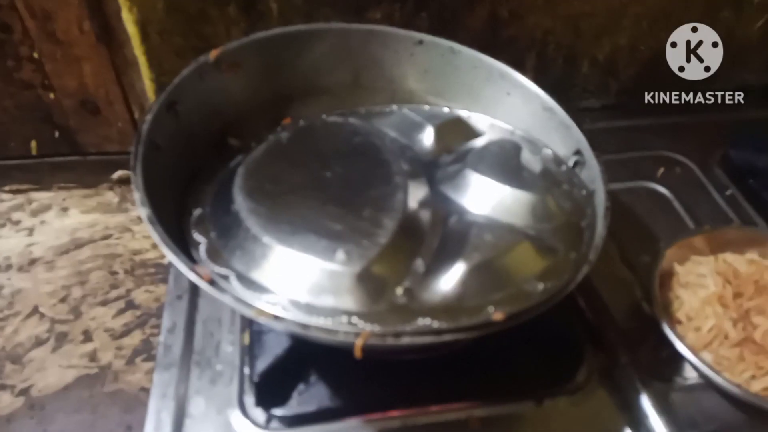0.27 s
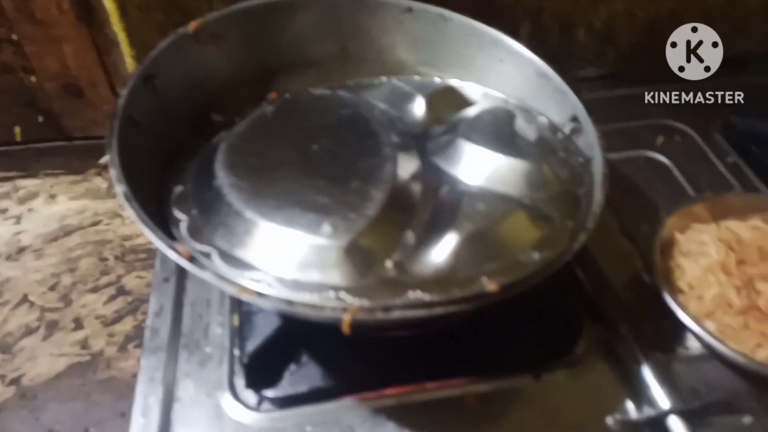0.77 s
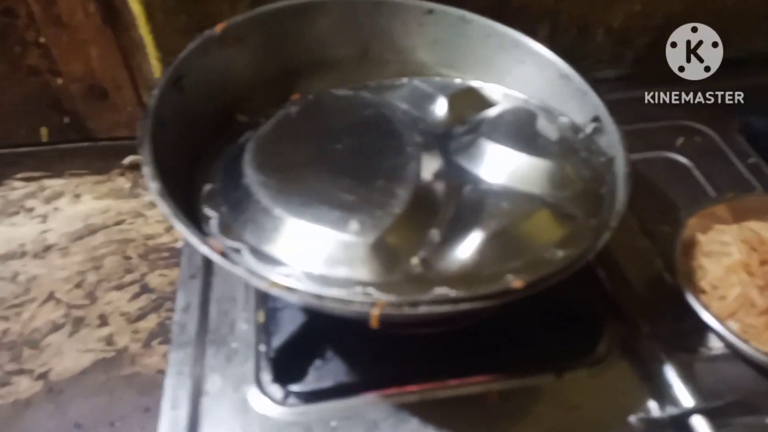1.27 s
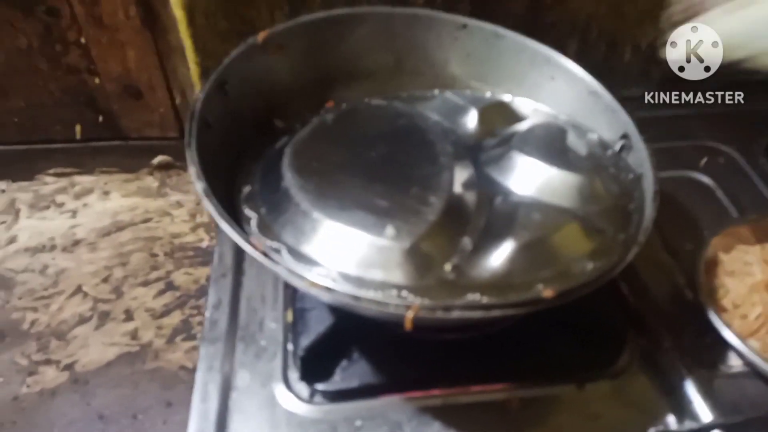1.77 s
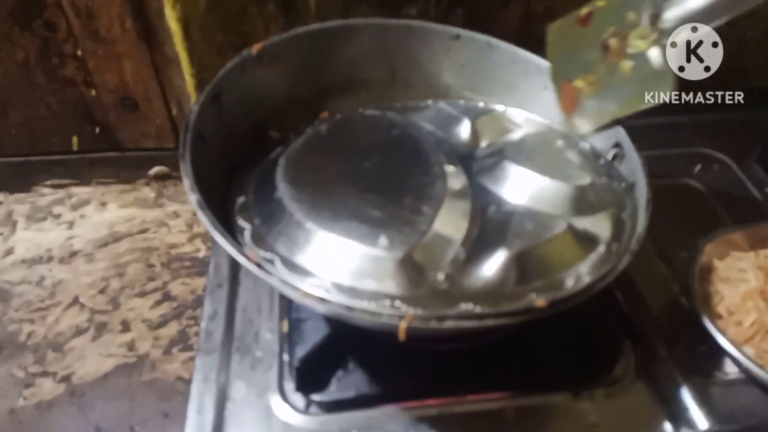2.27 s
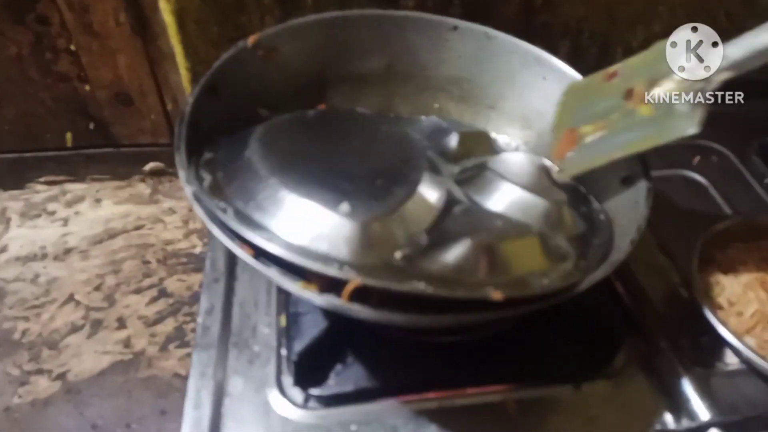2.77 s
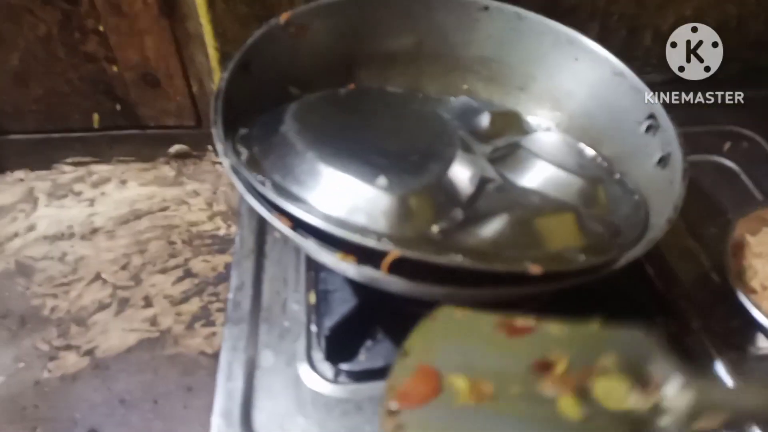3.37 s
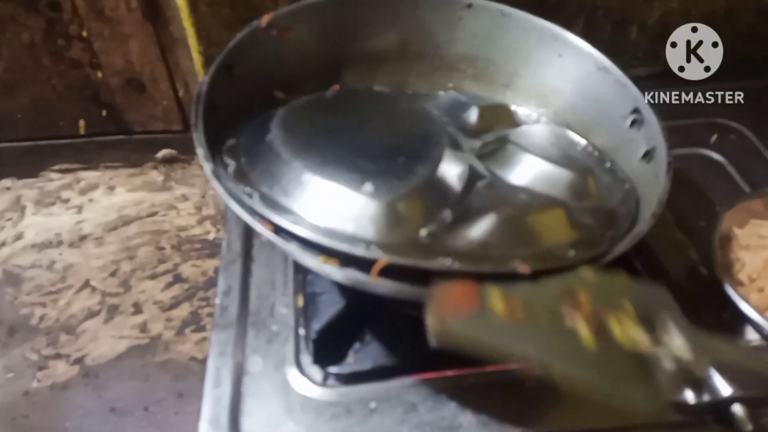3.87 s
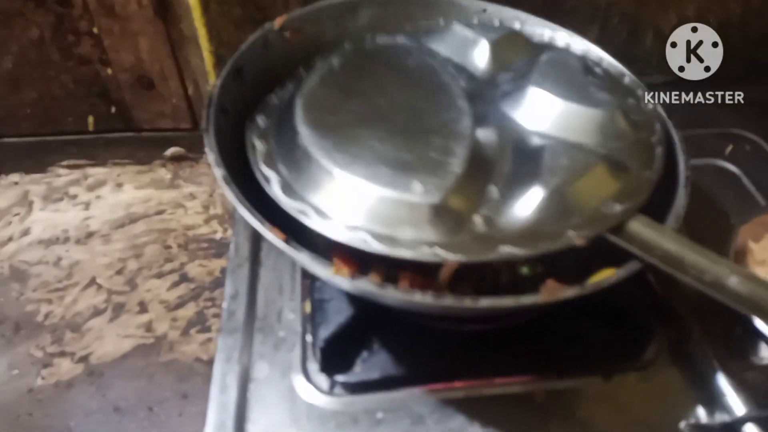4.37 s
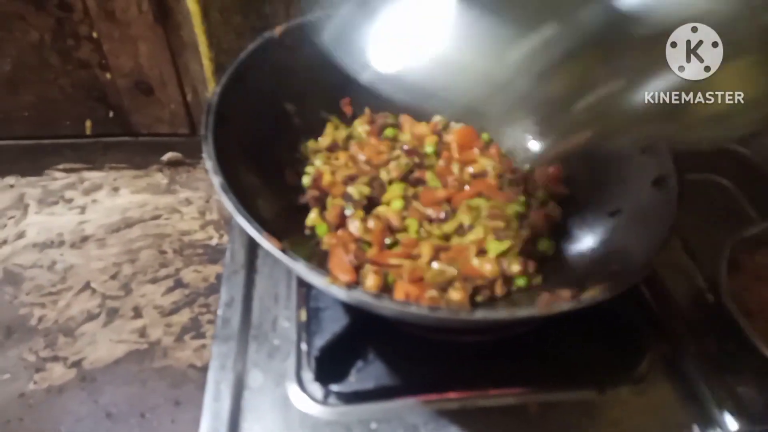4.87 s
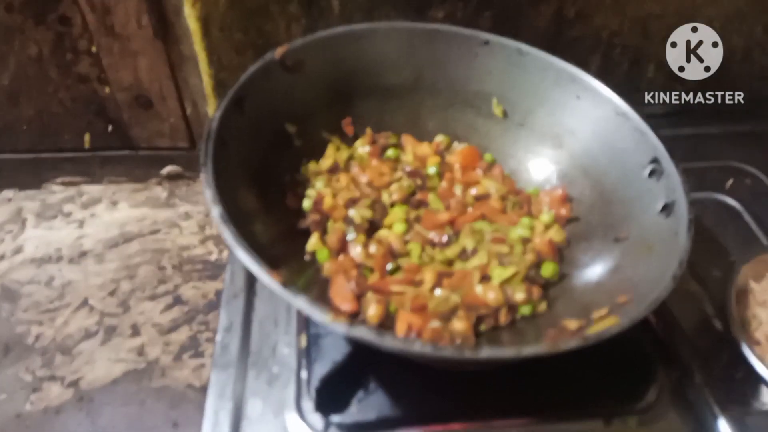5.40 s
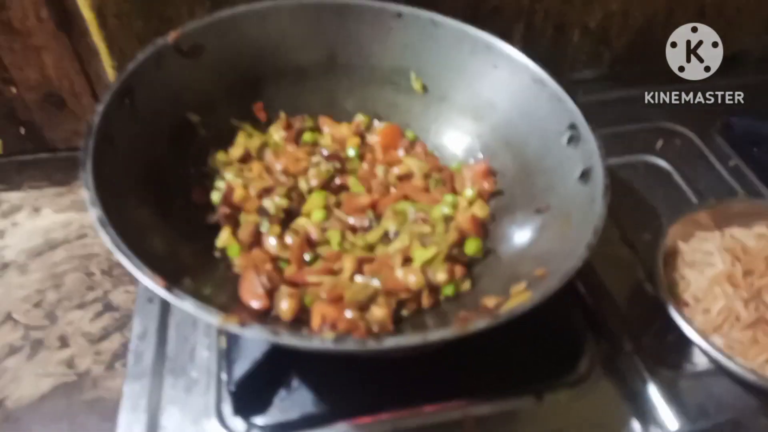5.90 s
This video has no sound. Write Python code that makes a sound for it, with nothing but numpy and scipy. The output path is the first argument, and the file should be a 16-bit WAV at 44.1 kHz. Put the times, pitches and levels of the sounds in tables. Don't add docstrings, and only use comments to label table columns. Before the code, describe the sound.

Close in a small hard kitchen, vegetables hiss softly under a steel lid while faint drags rub the stove's sheet metal. A sharp fat pop scatters droplets. Then a spatula taps and scrapes the lid, clanks it hard, pauses with a low puff of air on the microphone, rattles it off, and finally the lid lands on the stove with loud bright clatter.

```python
import sys
import numpy as np
from scipy import signal
from scipy.fft import rfft, irfft, next_fast_len
from scipy.io import wavfile
from scipy.ndimage import uniform_filter1d

SR = 44100
rng = np.random.default_rng(int(sys.argv[2]) if len(sys.argv) > 2 else 0)


def volts(x):
    e = np.asarray(x, float) / 20
    return 10 ** e


def generate_wav(sig):
    pcm = np.round(np.clip(np.atleast_2d(sig).T, -1, 1) * 32767).astype(np.int16)
    wavfile.write(sys.argv[1], SR, pcm)


N = 270838
T = np.arange(N) / SR

STAGES = [
    (2.17, 3.45),
    (3.544, 4.75),
    (5.3, 6.14),
]
# most pressure in seconds, rise in seconds,
# release in seconds, low body level in dB, ring in dB re body.
SCRAPES = [(2.192, 0.011, 0.5, -36, -4.5), (2.35, 0.062, 0.15, -34, -11.5), (2.52, 0.0072, .12, -50, 7),
           (2.701, 0.1, 0.1, -27, -3), (2.798, 0.034, 0.15, -25, -10), (2.95, 0.23, 0.51, -64, 23),
           (3.33, 0.03, 0.1, -59, 0.5), (3.578, 0.034, 0.13, -22, -9), (3.72, 0.13, 0.13, -35.5, -8.5),
           (3.819, 0.034, 0.073, -29, 2), (3.936, 0.07, 0.15, -26.5, -12), (3.99, 0.017, 0.3, -31.5, 1.5),
           (4.07, 0.038, 0.41, -26, -4), (4.14, 0.016, 0.31, -27, -25), (4.2, 0.05, 0.37, -26.5, 0.5),
           (4.379, 0.035, 0.15, -24, -3.5), (4.5, 0.08, 0.027, -32, -22.5), (5.399, 0.062, 0.31, -53, 17),
           (5.55, 0.11, 0.12, -27, -21.5), (5.64, 0.064, 0.62, -25.5, 1.5), (5.79, 0.013, 0.13, -27, 5),
           (5.876, 0.011, 0.031, -23, 3.5), (5.927, 0.028, 0.23, -22, 3.5), (6.129, 0.053, 0.072, -20, -5)]
# time in seconds, peak level in dB, low body in dB re peak,
# loudest mode in Hz, ring t60 in seconds.
KNOCKS = [(2.184, -17.5, -31, 6600, 0.13), (2.413, -20.5, -4.5, 7340, 0.098), (2.4414, -32, -4, 7560, 0.23),
          (2.528, -23.5, -12, 3520, 0.14), (2.630, -23, -8, 7400, 0.047), (2.7841, -7.5, -3.5, 717, 0.15),
          (2.8197, -16, 1, 621, 0.3), (3.5464, -10.5, -1, 4300, 0.071), (3.8056, -20, 5, 4260, 0.24),
          (3.924, -19.5, 6.5, 898, 0.3), (3.98, -14.5, -3, 4090, 0.14), (4.0431, -15.5, -5, 1035, 0.19),
          (4.1217, -8.5, 2, 704, 0.2), (4.1785, -16.5, 7.5, 899, 0.31), (4.3581, -8.5, -5, 705, 0.17),
          (4.663, -46, -18, 2300, 0.4), (5.617, -12.5, 4, 3080, 0.067), (5.624, -6, -1.5, 827, 0.13),
          (5.7777, -4.5, 5, 2427, 0.087), (5.826, -12, -2, 2560, 0.07), (5.874, -25, 8, 3950, 0.05),
          (5.906, -7, 8, 4040, 0.12), (5.944, -12, -20, 4350, 0.067), (6.108, -9.5, 5, 4060, 0.07)]
LANDINGS = (2.785, 3.808, 3.919, 3.978, 4.123, 4.355, 5.617, 5.777, 5.904, 6.107)
# frequency in Hz, level in dB, t60 in seconds.
TIPPED_MODES = [(205, 8, 5.0), (261, 11, 1.), (563, 4, .3), (684, 9, 0.25), (840, -2, 0.27),
                (1080, -4, 0.18), (1866, -23, 1.0), (3040, 4, 0.29), (3315, 8, 0.13), (3410, -5, 0.19),
                (4240, -7, 3.0), (4350, -6, 0.23), (5960, 16, 5.0), (7480, 22, 5.0)]
LEVERED_MODES = [(214.3, -9, 1.7), (517, -16, 0.53), (782, -7, 1.3), (899, -5, 3.4), (1110, -12.5, 5.0),
                 (1860, -7, 0.13), (2540, 13, 5.0), (3140, 14, 5.0), (3520, 17.5, 5.0), (3380, 16, 5.0),
                 (4370, 1, 0.27), (5500, -29, 0.47), (6510, 13, 0.35), (6600, -9, 0.66), ]
SET_DOWN_MODES = [(206, -1, 1.1), (268, -3, 1.), (847, -13, .5), (1182, -10, .4), (1770, -0.5, 2.),
                  (2440, 8, 2.), (2710, 6, 2.), (2940, 10, .7), (3050, 5, .6), (3397, 13, .2),
                  (3670, 11, .3), (4080, 17, .2), (4570, 4, .4), (5810, -3, .3)]
# frequency in Hz, level in dB per Hz.
STEEL = [(53, -82), (90, 9), (259, 7), (313, 9), (655, 6), (899, 0.5), (979, 3.5), (1160, -4), (1490, -9),
         (3620, -3.5), (7430, -7.5), (13100, -25.5), (14000, -39)]
BORDERS_HZ = (1400, 5500)
# time in seconds, peak in dB, centre in Hz.
SPITS = [(0.0177, -20, 3020), (0.382, -31, 3000), (0.8748, -18, 2900), (0.8766, -17, 3000),
         (0.8978, -17, 4500), (.908, -23, 7000), (.931, -22, 7000), (0.94, -20, 3000), (0.9745, -23, 7000),
         (1.799, -25.5, 4000), (2.1872, -11, 9000), (2.297, -24, 6220), (2.4396, -17, 7480),
         (2.52, -26, 5390), (2.5484, -28, 7320), (2.6133, -22, 7390), (2.6305, -22, 7470),
         (2.6781, -23, 6000), (2.8273, -18, 5880), (2.835, -23, 6800), (2.9722, -28, 7280),
         (3.322, -30, 2680), (3.335, -24, 2500), (3.5048, -28, 6540), (4.3584, -10, 3500),
         (4.4417, -16, 3130), (4.5774, -22, 6440), (4.97, -26, 3000), (5.3432, -26, 6640),
         (5.531, -29, 3000), (5.6071, -20, 6800), (5.6969, -20, 6000), (5.7775, -12, 9000),
         (5.8256, -19, 8500), (5.944, -8, 9460), (5.949, -10, 7000), (5.906, -8.5, 4000), (6.127, -9, 2500)]
# start in seconds, level in dB, decay in seconds.
SPATTER = (.892, -26, 0.077)
# frequency in Hz, width in Hz, level in dB.
SHOWER = [(1780, 540, 1), (3220, 500, -1), (4300, 500, -1), (6900, 1900, 1)]
# most pressure in seconds, rise in seconds, release in seconds,
# thrum level in dB, hum in dB re thrum.
DRAGS = [(.02, 0.033, 0.024, -55, 12), (.23, 0.08, 0.08, -45.5, -30), (.37, 0.093, 0.12, -45, -2),
         (.64, 0.1, 0.11, -35.5, -7.5), (.75, 0.032, 0.038, -48.5, -30), (.93, 0.13, 0.037, -52.5, -1),
         (1.04, 0.12, 0.094, -62, 17), (1.3, 0.065, 0.044, -30.5, -44), (1.359, 0.05, 0.11, -29, -49),
         (1.46, 0.17, 0.17, -32.5, -26), (1.62, 0.053, 0.097, -46, -8), (1.759, 0.042, 0.086, -40, -30),
         (2.03, 0.11, 0.072, -70, 27), (4.545, 0.2, 0.1, -25.5, -32), (4.88, 0.15, 0.26, -45, 0),
         (5.0, 0.092, 0.059, -45.5, 5.5), (5.5, 0.084, 0.1, -34, -30), (5.545, 0.05, 0.09, -27, 2.5)]
# frequency in Hz, width in Hz, level in dB.
STOVE_MODES = [(147, 24, 0.), (316.4, 8.3, -7.5), (407.4, 6.4, 0.5), (432.5, 35.6, 6), (549, 38, -7),
               (705, 62, 21), (897, 15, 16.5), (1070, 520, 16), (1265, 160, 19), (1383, 32, 15)]
# start in seconds, frequency in
# Hz, level in dB, length in seconds.
SINGING_TONES = [(1.105, 9000, -40.5, 0.048), (4.79, 421, -52, 0.17), (2.19, 205, -37.5, .12),
                 (1.135, 14600, -40, 0.037), (2.19, 3448, -31.5, 0.05), (2.186, 10740, -39, 0.051),
                 (2.785, 10400, -36, 0.02), (2.88, 4350, -45, 0.4), (3.49, 686, -48, 0.075),
                 (3.71, 920, -34, 0.04), (3.82, 874, -29.5, 0.054), (4.165, 3460, -24, .09),
                 (4.17, 2540, -34.5, 0.092), (4.18, 4370, -28.5, 0.074), (4.44, 3140, -46, 0.13),
                 (4.48, 1590, -57, 0.41), (4.97, 1950, -48, 0.085), (5.012, 3150, -39, 0.026),
                 (5.36, 850, -39.5, 0.063), (5.5, 151.3, -34, 0.063), (5.62, 206, -30, 0.095),
                 (5.38, 4310, -40.5, 0.18), (5.44, 2650, -40.5, 0.11), (5.62, 915, -27, 0.15),
                 (5.62, 861.5, -22.5, 0.1), (5.93, 1169, -31, 0.17), (5.96, 3690, -28, .08),
                 (6.02, 619, -30, 0.09), (2.24, 702, -42.5, .1), (2.32, 678, -36, .05), (2.345, 1018, -40, .05),
                 (2.61, 7500, -30, 0.043), (2.64, 860, -42, 0.027), (2.68, 1116, -32, .05),
                 (2.3, 10600, -41, .06), (2.33, 9100, -42, .04), (3.08, 3180, -45, .04),
                 (3.32, 1080, -49, 0.041), (3.35, 1356, -49, 0.045), (3.345, 703, -49, 0.029),
                 (3.55, 2980, -33.5, .05), (4.118, 1910, -27.5, .02), (4.48, 431, -26, .07),
                 (5.77, 250, -26, .03), (6.1, 249, -19.5, 0.027),
                 (.2, 1190, -51, .04), (.2, 720, -52, .04), (.33, 545, -44, .04), (.34, 715, -49, .06),
        (.6, 700, -45, .04), (.6, 320, -42, .07), (.655, 890, -48, .04), (.92, 320, -50, .04),
        (.97, 1080, -55, .07), (1.27, 431, -36, .27), (1.74, 705, -49, .04), (2.95, 2750, -47, .1),
        (2.96, 1950, -50, .12), (3.0, 4550, -47, .15), (3.72, 3400, -44, .04), (3.81, 3100, -36, .07),
        (4.17, 3580, -28, .06), (4.12, 3380, -28, .04), (4.13, 520, -30, .1), (4.83, 300, -50, .1),
        (5.37, 3080, -45, .1), (5.38, 4150, -44, .1), (5.8, 150, -33, .15), (5.905, 4060, -23, .03),
        (5.905, 2900, -27, .05), (6.03, 120, -33, .08)]
# start in seconds, frequency in Hz, level in dB, length in seconds.
BRUSHES = [(0, 2150, -41, .045), (0, 4500, -42, .04), (0, 800, -48, .04), (.57, 1330, -49, .06),
           (1.25, 1870, -36.5, .18), (1.26, 1210, -39, 0.15), (1.49, 1090, -44, 0.14),
           (2.185, 1190, -31, .021), (2.3, 6660, -27, 0.085), (3.548, 2200, -37, .05),
           (3.55, 1275, -36, 0.12), (5.46, 560, -34, .1)]
# time in seconds, sizzle level in dB, lid opening from 0 to 1.
FRY = [(0.0, -47.5, 0.01), (2.2, -50.5, 0), (2.36, -37.5, 0.22), (2.6, -44, 0.14), (3.78, -43.5, 0.12),
       (4.3, -41, 0.27), (4.5, -41, 0.18), (5.3, -38, 0.24), (5.59, -39, 0.33), (5.86, -46.5, 0.5),
       (6.14, -46.5, 0)]
# frequency in Hz, level in dB per Hz.
COVERED = [(24, -55), (40, 35), (109, -3.5), (205, -11), (404, -4.5), (904, -6), (1190, 6.5), (1830, -2.5),
           (2130, -20.5), (2540, -2), (3790, -10.5), (6590, -6), (13900, -8.5), (15500, -1.5), (16500, -12)]
OPEN = [(24, -65), (40, -33), (270, -30), (404, -39), (669, -49), (975, 12), (1610, -63), (2240, -8),
        (2600, -44), (3100, 4), (5130, 3), (7290, 23), (13900, -0.5), (15500, 29), (16500, -9)]
# frequency in Hz, width in Hz, level in dB.
HOLLOW = [(1145, 590, -23), (1779, 173, 13), (2300, 120, 2), (2343, 840, 10), (6800, 2200, 7),
          (14820, 1050, 5)]
# peak in seconds, rise in seconds, release in seconds, level in dB,
# cut-off in seconds.
PUFF = (3.31, .055, .36, -31, 3.46)


def lid():
    rub, blows = np.zeros((2, N))
    stage_modes = [paired(m) for m in (TIPPED_MODES, LEVERED_MODES, SET_DOWN_MODES)]
    steel = shimmer()
    for stage, modes, edge_db in zip(STAGES, stage_modes, (-7.5, -21, -14)):
        add(rub, *scrape(stage, modes, steel, edge_db))
    for row in KNOCKS:
        modes = stage_modes[np.searchsorted((3.4, 5.2), row[0])]
        add(blows, *knock(row, modes, steel[SR // 2:]))
    parting = np.ones(N)
    for s in LANDINGS:
        parting *= 1 - 0.95 * np.exp(-np.abs(s - T) / 0.012) * (T < s)
    return rub * parting + blows


def scrape(stage, modes, steel, edge_db, dense_db=2.0):
    edge_follows = 0.56
    t = T[(T >= stage[0]) & (T < stage[1])]
    at, n = round(stage[0] * SR), len(t)
    body_db, ring_db = np.transpose(SCRAPES)[3:]
    levels_db = body_db, body_db + ring_db, body_db + edge_db + edge_follows * ring_db
    gains = [strokes(SCRAPES, db, t) for db in levels_db]
    gains[2] = gains[2] * puffs(n, 90, 0.0044, -1.3)
    slips = grit(n, 2000, 3)
    tones = np.zeros(n)
    for hz, db, t60 in zip(*modes):
        swell = volts(db + 2.5 * drift(n, .05))
        tones += ring(slips * swell, hz, 2.2 / np.clip(t60, .03, .09))
    chatter = volts(1.3 * drift(n, .01))
    dense = volts(dense_db)
    bands = zip(gains, split(tones), split(steel[at:][:n]))
    rubbed = sum(gain * (tone + dense * haze) for gain, tone, haze in bands)
    return at, chatter * rubbed / np.hypot(1, dense)


def knock(row, modes, steel, crack_db=-4.0, dense_db=3.5, own_db=7.0):
    s, peak_db, low_db, own_hz, t60 = row
    edge_db = -14.5 + 7 * np.log2(own_hz / 1000)
    at, t = round(s * SR), np.arange(8192) / SR
    hz, db = modes[0][:, None], modes[1][:, None]
    spot, phase, life = rng.standard_normal((3, len(hz), 1))
    t60 = np.clip(t60, .01, .4)
    decay_db = -60 * t / (t60 * volts(2 * life))
    tones = (volts(db + 2 * spot + decay_db) * np.sin(2 * np.pi * hz * t + phase)).sum(0)
    crack = colour(rng.standard_normal(len(t)), lambda f: volts(read(STEEL, f)))
    out = volts(own_db - 60 * t / t60) * np.sin(2 * np.pi * own_hz * t)
    levels_db, rises_s = (low_db, 0, edge_db), (.002, .0006, .0003)
    bands = zip(levels_db, rises_s, split(tones), split(steel[at:at + len(t)]), split(crack))
    for band_db, rise, tone, haze, snap in bands:
        struck = tone / np.sqrt(np.mean(tone[:400] ** 2))
        struck = struck + haze * volts(dense_db - 60 * t / (0.74 * t60))
        struck = struck + snap * volts(crack_db - 60 * t / 0.003)
        out = out + volts(band_db) * struck * (1 - np.exp(-t / rise))
    tick_hz = 8180 + (11900 - 8180) * rng.random((9, 1))
    tick = np.sin(2 * np.pi * tick_hz * t).sum(0) / 2
    out = out + volts(.5 * edge_db - 5 - 60 * t / 0.043) * tick
    return at, volts(peak_db - 18.0) * out * np.cos(np.pi / 2 * t / t[-1])


def paired(modes):
    hz, db, t60 = np.transpose(modes)
    shift = 1 + 0.0115 * rng.standard_normal((len(hz), 2)) * [0, 1]
    return (hz[:, None] * shift).ravel(), np.repeat(.5 * db, 2), np.repeat(t60, 2)


def shimmer():
    hz, t, z = signal.stft(rng.standard_normal(N + SR), SR, nperseg=1024, noverlap=768)
    clumps = rng.standard_normal((len(t), len(hz))).T
    fine = evened(uniform_filter1d(uniform_filter1d(clumps, 9, 1), 2, 0))
    broad = evened(uniform_filter1d(uniform_filter1d(clumps, 12, 1), 10, 0))
    z = z * volts(read(STEEL, hz)[:, None] + 3.8 * fine + 1.2 * broad)
    return signal.istft(z, SR, nperseg=1024, noverlap=768)[1]


def spits(q=1.45, snap_s=0.00048, tail_s=0.0088):
    out, t = np.zeros(N), np.arange(600) / SR
    for s, db, hz in SPITS:
        burst = np.exp(-t / snap_s) + 0.17 * np.exp(-t / tail_s)
        snap = ring(rng.standard_normal(len(t)) * burst, hz, hz / q)
        add(out, round(s * SR), volts(db) * snap / np.abs(snap).max())
    start, db, decay = SPATTER
    t = np.arange(SR // 4) / SR
    drops = rng.standard_normal(len(t)) + 0.63 * grit(len(t), 1000, 4.2)
    rung = np.zeros(len(t))
    for hz, width, g_db in SHOWER:
        rung += volts(g_db) * ring(ring(drops, hz, width), hz, width) / np.sqrt(SR / width)
    shape = (1 - np.exp(-t / 0.0042)) * np.exp(-(t / decay) ** 4 / 2)
    add(out, round(start * SR), volts(db - 8.) * evened(rung) * shape)
    return colour(out, lambda hz: hz ** 3 / (hz ** 3 + 1300.0 ** 3))


def stove():
    thrum_db, hum_db = np.transpose(DRAGS)[3:]
    parts = np.zeros((3, N))
    for hz, width, db in STOVE_MODES:
        rub = rng.standard_normal(N) * volts(1.5 * drift(N, .07))
        mode = ring(ring(rub, hz, 1.5 * width), hz, 1.5 * width)
        parts[np.searchsorted((220, 620), hz)] += volts(db) * evened(mode)
    rasp_db = -24.5 + 0.72 * thrum_db
    layers_db = thrum_db + hum_db, thrum_db, rasp_db
    return sum(strokes(DRAGS, db, T) * evened(part) for db, part in zip(layers_db, parts))


def steam():
    out = np.zeros(N)
    for rows, q, rise in ((SINGING_TONES, 36, .1), (BRUSHES, 5.5, .3)):
        for s, hz, db, length in rows:
            noise, waver = rng.standard_normal(SR * 3 // 4), drift(SR, 0.035)
            band = evened(ring(ring(noise, hz, hz / q), hz, hz / q)[-int(1.5 * length * SR):])
            if q > 20:
                band = band + 1.3 * min(1, 700 / hz) * np.sin(2 * np.pi * hz * T[:len(band)])
            u = np.arange(len(band)) / len(band)
            shape = np.minimum(u / rise, 1) * np.cos(np.pi / 2 * u ** 0.66)
            shape = shape * volts(2.5 * waver[:len(band)])
            add(out, round(s * SR), volts(db) * evened(band) * shape)
    return out


def sizzle(patchy_db=2.0, flicker_db=0.3, pop_db=-8.0):
    hz = np.fft.rfftfreq(512, 1 / SR)
    source = rng.standard_normal(N) * puffs(N, 450, 0.00073, pop_db)
    t, z = signal.stft(source, SR, nperseg=512, noverlap=384)[1:]
    s, level_db, opening = np.transpose(FRY)
    opening = np.clip(np.interp(t, s, opening), 0, 1)
    top = (hz > 8500) & (hz < 15000)

    def levelled(db):
        return db - 10 * np.log10(np.sum(volts(db[top]) ** 2) / len(hz))

    hollow = sum(db / (1 + (2 * (hz - f) / w) ** 2) ** 2 for f, w, db in HOLLOW)
    shut, free = levelled(read(COVERED, hz) + hollow), levelled(read(OPEN, hz))
    patches = rng.standard_normal((len(t), len(hz))).T
    patches = evened(uniform_filter1d(uniform_filter1d(patches, 5, 0), 18, 1))
    flicker = evened(uniform_filter1d(rng.standard_normal(len(t)), 3))
    field_db = np.outer(shut, 1 - opening) + np.outer(free, opening) + np.interp(t, s, level_db)
    z = z * volts(field_db + patchy_db * patches + flicker_db * flicker)
    return signal.istft(z, SR, nperseg=512, noverlap=384)[1][:N]


def puff(level_db=4.0):
    gust = colour(rng.standard_normal(N), lambda hz: hz / (1 + (hz / 78.0) ** 5))
    cut = np.clip((PUFF[4] - T) / 0.042 + 1, .12, 1)
    return volts(level_db) * strokes([PUFF], [PUFF[3]], T) * cut * evened(gust)


def kitchen(x, t60=0.19):
    at = np.arange(200, SR // 2, 22)
    taps = np.zeros(SR // 2 + 22)
    fade = volts(-60 * at / SR / t60)
    taps[at + rng.integers(0, 22, len(at))] = rng.choice([-1., 1.], len(at)) * fade
    taps = signal.lfilter([1], [1, -.4], taps)
    return signal.fftconvolve(x, taps / np.linalg.norm(taps))[:N]


def strokes(rows, gains_db, t):
    peak, rise, release = np.transpose(rows)[:3, :, None]
    ms = np.arange(t[0], t[-1] + .001, .001)
    before, after = (peak - ms) / np.maximum(rise, .004), (ms - peak) / np.maximum(release, .02)
    away = np.where(ms < peak, before, after)
    power = volts(np.asarray(gains_db)[:, None] - 20 * away ** 1.3) ** 2
    return np.interp(t, ms, np.sqrt(power.sum(0)))


def puffs(n, per_s, decay_s, share_db):
    jumps = signal.lfilter([1], [1, -np.exp(-1 / (decay_s * SR))], np.abs(grit(n, per_s, 3)))
    return evened(1 + volts(share_db) * evened(jumps))


def grit(n, per_s, spread_db):
    u, e, sign = rng.random(n), rng.exponential(1, n), rng.standard_normal(n)
    return evened((u < per_s / SR) * volts(spread_db * np.minimum(e, 5)) * np.sign(sign))


def drift(n, seconds):
    points = rng.standard_normal(n // 441 + 2)
    points = evened(uniform_filter1d(points, max(int(seconds / .01), 1)))
    return np.interp(np.arange(n), 441 * np.arange(len(points)), points)


def ring(x, hz, width):
    r, turn = np.exp(-np.pi * width / SR), 2 * np.pi * hz / SR
    gain = np.sqrt(2 * (1 - r * r)) * np.sin(turn)
    return signal.lfilter([gain], [1, -2 * r * np.cos(turn), r * r], x)


def split(x):
    z, hz = rfft(x), np.fft.rfftfreq(len(x), 1 / SR)
    low = 1 / (1 + (hz / BORDERS_HZ[0]) ** 12)
    top = 1 - 1 / (1 + (hz / BORDERS_HZ[1]) ** 12)
    shares = low, 1 - low - top, top
    return [evened(irfft(z * np.sqrt(np.clip(w, 0, 1)), len(x))) for w in shares]


def colour(x, gain):
    size = next_fast_len(len(x), True)
    size += size % 2
    return irfft(rfft(x, size) * gain(np.fft.rfftfreq(size, 1 / SR)), size)[:len(x)]


def read(points, hz):
    f, value = np.transpose(points)
    return np.interp(np.log(hz + 1), np.log(f + 1), value)


def evened(x):
    return x / np.sqrt(np.mean(x ** 2) + 1e-20)


def add(mix, at, sound):
    part = mix[max(at, 0):][:len(sound)]
    part += sound[:len(part)]


def scene():
    metal = lid() + spits()
    close = metal + volts(-12.5) * kitchen(metal)
    return (close + stove() + sizzle() + puff() + steam())[None]


def roll_off(x):
    return signal.sosfilt(signal.butter(12, 16660, fs=SR, output="sos"), x)


def record(dry):
    def response(hz):
        dip = volts(-3. * np.exp(-((hz - 13200.) / 2370.0) ** 2))
        edge = np.where(hz < 15500, 1, volts(-58.))
        return dip * edge / np.sqrt(1 + (255.0 / (hz + 1)) ** 3)
    return roll_off(colour(dry[0], response)[None])


dry = scene()
out = record(dry)
generate_wav(out)
```